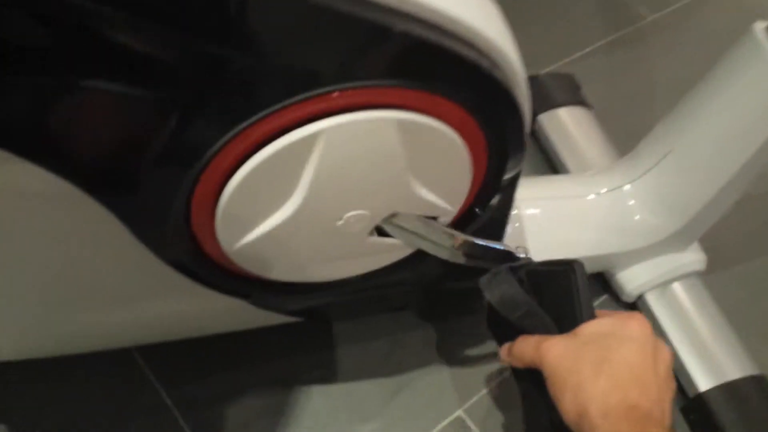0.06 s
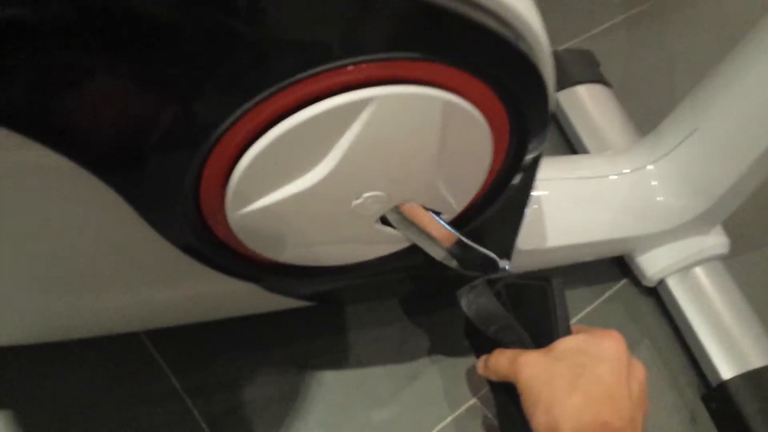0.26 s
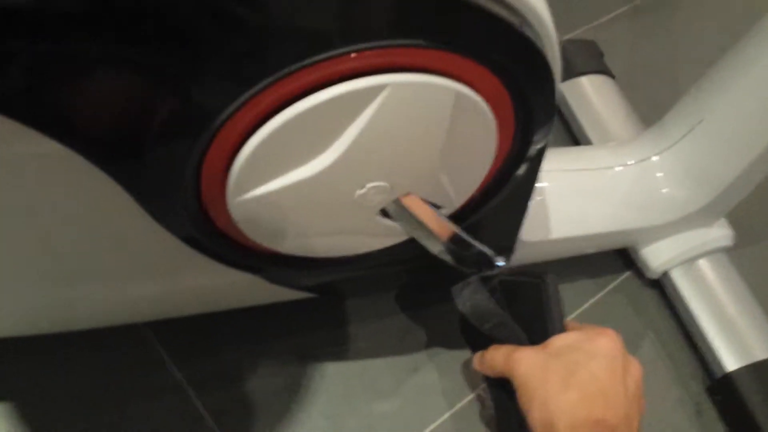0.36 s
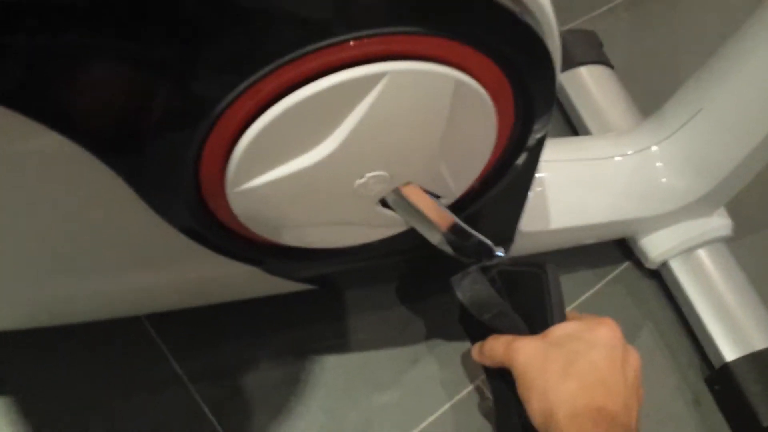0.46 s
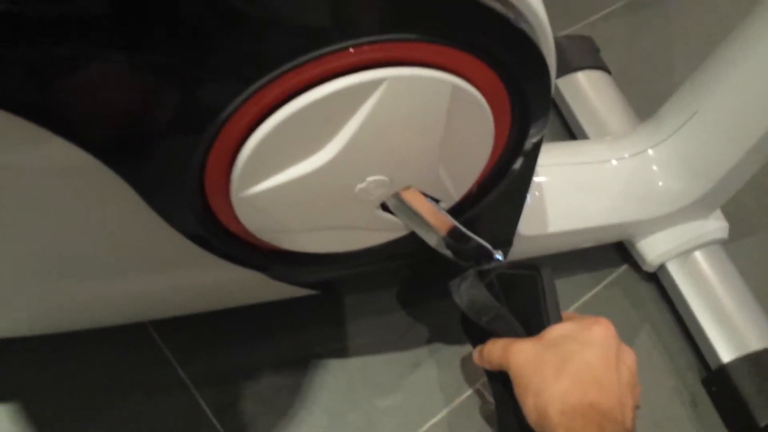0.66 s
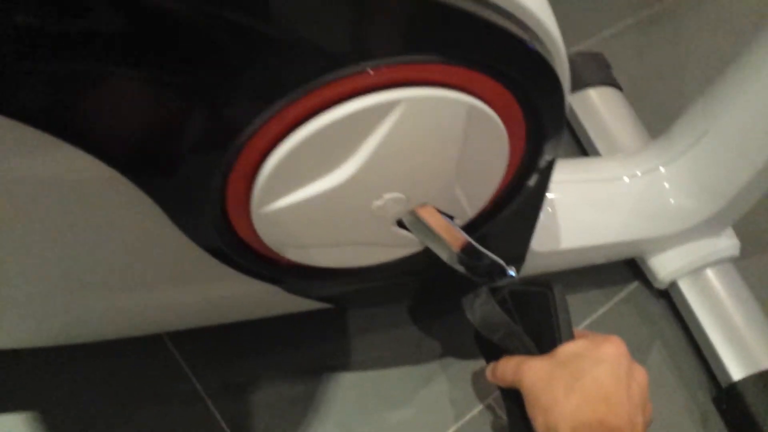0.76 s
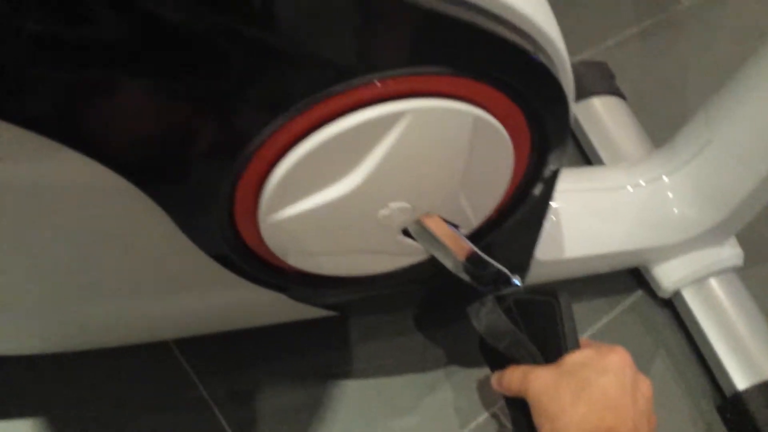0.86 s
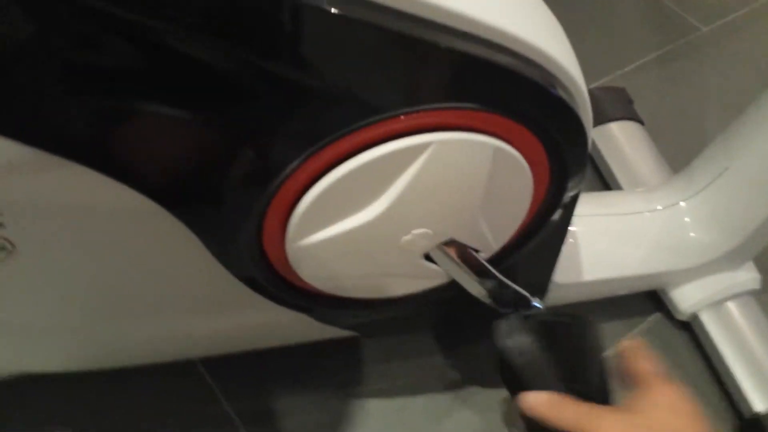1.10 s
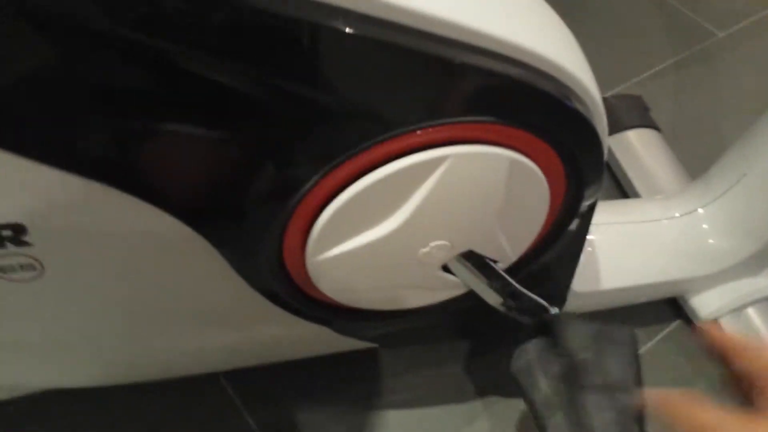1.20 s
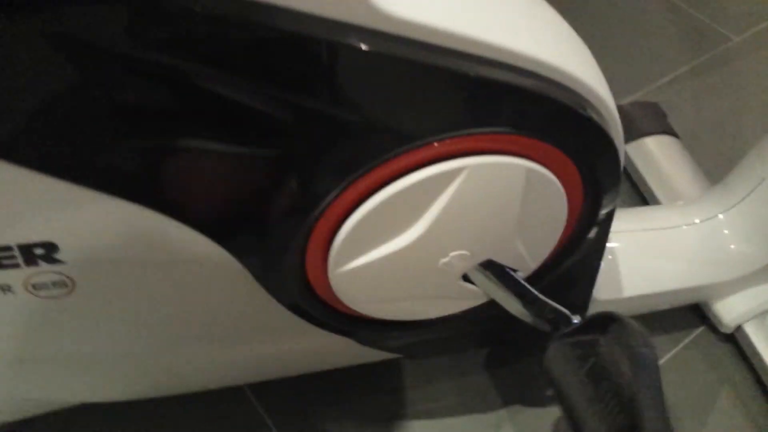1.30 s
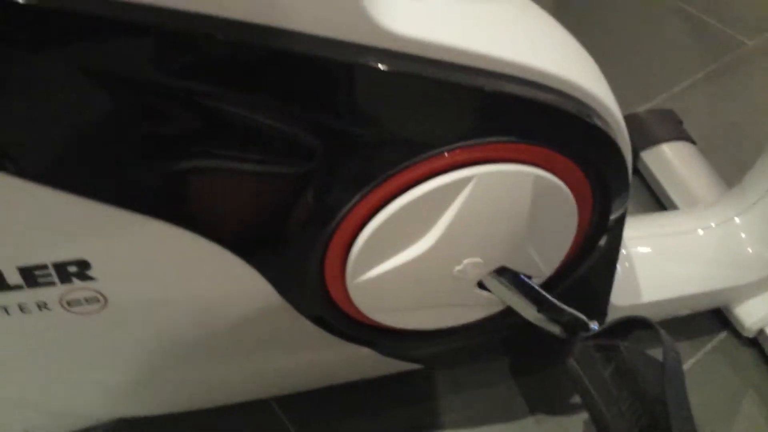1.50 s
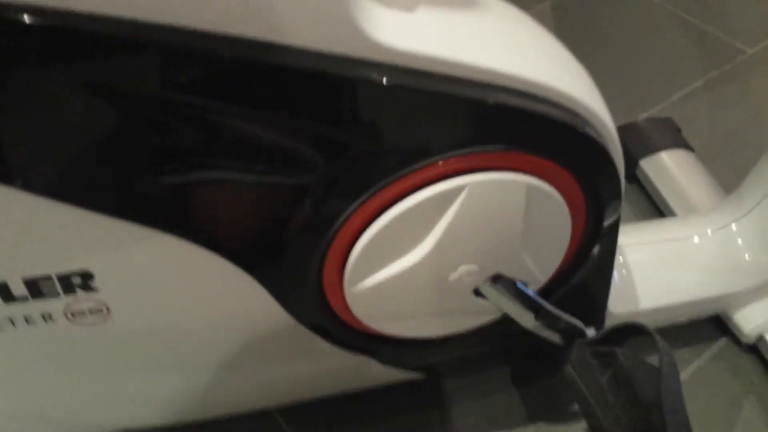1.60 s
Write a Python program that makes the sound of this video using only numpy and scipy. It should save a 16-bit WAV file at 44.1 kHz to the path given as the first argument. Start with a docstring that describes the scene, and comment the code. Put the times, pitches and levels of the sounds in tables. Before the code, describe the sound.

Close up in a quiet, slightly echoing room, an exercise bike's flywheel gives a short, squeaky scrape and jams, making the housing boom. A faint hand rustle leads into one sharp pedal clack, followed by soft knocks.

```python
"""The flywheel of an exercise bike, turned by hand close by, grinds hard and sings briefly as the hiss
of an earlier scrape dies away. Stick-slip friction excites the modes of the wheel until it jams, and
the blow sets the hollow housing booming. The hand lets go with a rustle; the pedal clacks in the play
of its bearing and knocks softly as it swings back. A quiet tiled room adds its reverberation."""
import sys
import numpy as np
from scipy import signal
from scipy.fft import rfft, irfft
from scipy.io import wavfile

SR = 44100
rng = np.random.default_rng(int(sys.argv[2]) if len(sys.argv) > 2 else 0)


def file_out(sig):
    """Save sig as 16-bit WAV at sys.argv[1]."""
    # one column per channel
    cols = np.atleast_2d(sig).T
    # limit, then scale
    lim = np.clip(cols, -1, 1)
    pcm = np.round(lim * 32767).astype(np.int16)
    wavfile.write(sys.argv[1], SR, pcm)


N = 72765
TIME = np.arange(N) / SR


# Friction force on the rim (time [s], level [dB])
RIM_FORCE = [(.19, -55), (.215, -35.5), (0.238, -22.5), (0.291, -19.5), (.345, -19.5), (.385, -17.5),
             (0.413, -21), (0.438, -42), (0.458, -31), (.54, -70.5)]
# Spectrum of the grinding (frequency [Hz], gain [dB])
RASP_SPECTRUM = [(60, -32.5), (120, -16), (200, -16), (320, -0.5), (450, -19), (560, -1), (800, -7),
                 (1400, 0), (2100, -1.5), (2400, -4.5), (3000, -6.5), (4000, -10.5), (4900, -9), (6600, -3),
                 (7700, -8.5), (8800, -14.5), (9700, -35.5), (10600, -21), (13000, -58)]
# Modes of the flywheel (frequency [Hz], relative level [dB], T60 [s])
WHEEL_MODES = [(331.7, -11, .15), (535.2, -8.5, 0.4), (826, -14, 0.083), (1031, -3, 0.081), (1208, -6, .25),
               (1407, -7.5, 0.11), (1483, -6.5, 0.53), (1653, -13.5, .12), (1917, -5, 0.17),
               (2013, 1, 0.067), (2157, -19.5, 0.52), (2720, 1, 0.067), (3154, 0.5, 0.064),
               (5770, 0, 0.035)]
def flywheel(slips_per_s=5000, spread_db=1.5, sway_db=3.5, sway_hz=42, rasp_db=-3, ring_db=-6):
    """Stick-slip friction: dense tiny slips of the rim rasp and drive the modes of the wheel."""
    slips = (rng.random(N) < slips_per_s / SR) * rng.choice([-1, 1], N)
    sizes = amp(spread_db * np.minimum(rng.exponential(1, N), 4))
    force = unit(slips * sizes * chatter()) * envelope(RIM_FORCE)
    ring = np.zeros(N)
    for hz, db, t60 in WHEEL_MODES:
        coupling = amp(sway_db * drift(sway_hz))  # the moving contact favours each mode in turn
        ring += amp(db) * unit(signal.fftconvolve(force * coupling, mode(hz, t60))[:N])
    ring = signal.sosfilt(signal.butter(2, [220, 7000], "band", fs=SR, output="sos"), ring)
    rasp = colour(force, RASP_SPECTRUM)
    return np.std(force) * (amp(rasp_db) * unit(rasp) + amp(ring_db) * unit(ring))


# Tones of the catching rim (time [s], duration [s], frequency [Hz], level [dB])
RIM_TONES = [(-.02, .065, 1873, -41), (-.02, .12, 4673, -51), (.108, .105, 4673, -45.5),
             (-.02, .22, 6700, -50), (.266, .04, 2050, -27), (.275, .035, 2706, -28), (.38, .045, 798, -28),
             (.402, .04, 1876, -21), (1.483, .05, 1875, -67)]
def squeals(waver=.0008, waver_hz=50, skew=.65):
    """Self-excited oscillation: friction locks on to one mode for a moment."""
    out = np.zeros(N)
    for start, length, hz, db in RIM_TONES:
        t = np.arange(0, length, 1 / SR)
        pitch = hz * (1 + waver * drift(waver_hz)[:len(t)])
        swell = np.sqrt(abs(np.sin(np.pi * (t / length) ** skew)))
        add(out, start, amp(db) * swell * np.sin(2 * np.pi * np.cumsum(pitch) / SR))
    return out


# Force of the loaded drive (time [s], level [dB])
DRIVE_FORCE = [(0, -59), (.08, -63), (.18, -60.5), (.205, -41), (.25, -53.5), (.32, -54.5), (.39, -40.5),
               (.435, -29), (.47, -45), (.56, -35.5)]
# Blows on the housing (time [s], level [dB], contact time [s], gain of the deep modes [dB])
BLOWS = [(0.4384, -14, 0.00053, -5.5), (0.452, -22, 0.0043, 11.5), (1.064, -37.5, 0.0016, -28),
         (1.086, -34.5, 0.0014, -6.5), (1.514, -44.5, 0.00066, -10), (1.536, -43, 0.0017, -13),
         (1.558, -51.5, .001, -0.5), (1.615, -52.5, .0007, -13.5)]
# Radiation of the housing, weak in the deep bass (frequency [Hz], gain [dB])
HOUSING_RADIATION = [(25, -22.5), (55, 1), (75, -5), (95, 2.5), (330, -4.5), (600, 6), (1200, -20.5),
                     (5000, -36.5)]
def housing():
    """Forced vibration: the drive and the blows shake the housing; longer contact sounds duller."""
    response = housing_response(deep_db=-5)
    force = rng.standard_normal(N) * envelope(DRIVE_FORCE)
    out = signal.fftconvolve(force, response / np.linalg.norm(response))[:N]
    for start, db, contact, deep_db in BLOWS:
        pulse = np.exp(-(2 * (TIME[:SR // 50] / contact - 1)) ** 2)
        add(out, start, amp(db) * signal.fftconvolve(housing_response(deep_db), pulse / pulse.sum()))
    return colour(out, HOUSING_RADIATION)


# Modes of the hollow housing (frequency [Hz], relative level [dB], T60 [s])
HOUSING_MODES = [(102.1, -5.5, 0.12), (125.3, -9, .2), (162, 0.5, 0.046), (197.7, 1.5, 0.099),
                 (233.5, 2, 0.073), (308, -6.5, 0.19), (362.2, -13, 0.28)]
def housing_response(deep_db, deep_below_hz=140):
    """Modal superposition: neighbouring modes start in antiphase, so the boom of a tap swells."""
    boom = sum((-1) ** k * amp(db + deep_db * (hz < deep_below_hz)) * mode(hz, t60)
               for k, (hz, db, t60) in enumerate(HOUSING_MODES))
    return boom / abs(boom).max()


# Contacts in the bearing (time [s], level [dB], decay time [s], centre frequency [Hz])
PEDAL_IMPACTS = [(1.0312, -51, .0025, 4200), (1.065, -19, .0012, 6200), (1.08, -30, .0022, 4500),
                 (1.1133, -38, .0015, 4600), (1.36, -60, .002, 7000), (1.478, -59, .004, 5800),
                 (1.612, -53, .004, 8000)]
# Spectrum of a contact (frequency [Hz], gain [dB])
IMPACT_SPECTRUM = [(200, -6.5), (700, -7.5), (1100, -8.5), (2500, -4.5), (7000, 5.5), (10000, -19.5),
                   (14500, -22)]
# Spectrum of the loose parts (frequency [Hz], gain [dB])
BUZZ_SPECTRUM = [(200, -34), (750, -23), (1080, 10), (1350, 0.5), (1750, 5.5), (3000, 0), (4500, 0.5),
                 (6500, 6.5), (9000, -14), (14500, -14.5)]
def pedal_clacks(rise_s=.0004, peak_db=7, width_octaves=.55, buzz_db=-22, buzz_decay_s=.035):
    """Backlash: the loose pedal makes hard, quickly damped impacts, and loose parts buzz after each."""
    out, t = np.zeros(N), TIME[:SR // 4]
    attack = np.minimum(t / rise_s, 1)
    for start, db, decay, centre_hz in PEDAL_IMPACTS:
        def peak(hz):
            return peak_db * np.exp(-.5 * (np.log2((hz + 1) / centre_hz) / width_octaves) ** 2)
        burst, buzz = rng.standard_normal((2, len(t)))
        burst = unit(colour(burst, IMPACT_SPECTRUM, peak)) * np.exp(-t / decay)
        buzz = unit(colour(buzz, BUZZ_SPECTRUM)) * np.exp(-t / buzz_decay_s)
        add(out, start, amp(db) * attack * (burst + amp(buzz_db) * buzz))
    return out


# The hand sliding off the pedal (time [s], level [dB])
HAND_SLIDE = [(.78, -78.5), (.92, -63), (1.01, -59), (1.06, -55), (1.12, -78)]
# Spectrum of skin on the strap (frequency [Hz], gain [dB])
RUSTLE_SPECTRUM = [(80, -6.5), (220, 0), (500, -1.5), (900, -10), (2000, -5), (4000, -7), (7000, -3),
                   (10000, -17), (14500, -16.5)]
def hand_rustle():
    """Sliding friction: skin and strap rustle faintly as the hand lets go."""
    return friction_noise(RUSTLE_SPECTRUM) * envelope(HAND_SLIDE, before_db=-120)


# Spectrum of a scrape's reverberation (frequency [Hz], gain [dB])
SCRAPE_TAIL_SPECTRUM = [(59, -37), (100, -17.5), (313, -6), (406, -14), (549, -9.5), (631, -26.5),
                        (1040, -6), (1720, -12), (2020, -1.5), (2420, -10), (4230, -9), (4590, -11),
                        (5390, -14.5), (6070, -4), (12000, -34), (15600, -77), (22000, -120)]
def scrape_tail(start_db=-34, fade_db_per_s=69.5):
    """Reverberation: the hiss of an earlier scrape dies away in the room."""
    return amp(start_db - fade_db_per_s * TIME) * friction_noise(SCRAPE_TAIL_SPECTRUM)


# Reverberation time of the tiled room (frequency [Hz], T60 [s])
ROOM_DECAY = [(80, 0.19), (250, 0.74), (600, 0.81), (2000, 0.81), (5000, .78), (8000, 0.62), (13000, 0.49)]
# Left ear relative to the right (frequency [Hz], gain [dB])
LEFT_SHADOW = [(60, -2), (180, -7.5), (350, -3), (700, -6), (1400, -6.5), (2800, -12.5), (5500, -8.5),
               (10000, -10.5)]
def room(x, wet_db, build_s=.0014, scatter_s=.0028, left_lag_s=.000278):
    """Reverberation: a diffuse tail follows the direct sound; the left ear lies in acoustic shadow."""
    hz, t, spectra = signal.stft(rng.standard_normal((2, SR)), SR, nperseg=256)
    decay = amp(-60 * t / read(ROOM_DECAY, hz)[:, None])
    spectra = spectra * decay * (1 - np.exp(-t / build_s))
    tails = two_ears(*signal.istft(spectra, SR, nperseg=256)[1][:, :SR])
    tails /= np.linalg.norm(tails[0])
    # The direct sound reaches the left ear later, its treble scattered in phase.
    scatter = rfft(rng.standard_normal(N) * np.exp(-TIME / scatter_s), 2 * N)
    hz = np.fft.rfftfreq(2 * N, 1 / SR)
    phase = np.angle(scatter) * (1 - read(EAR_COHERENCE, hz)) - 2 * np.pi * hz * left_lag_s
    direct = np.array([x, irfft(rfft(x, 2 * N) * np.exp(1j * phase))[:N]])
    right, left = direct + amp(wet_db) * signal.fftconvolve(x[None], tails, axes=1)[:, :N]
    return np.array([colour(left, LEFT_SHADOW), right])


# Likeness of the two ears (frequency [Hz], coherence [0..1])
EAR_COHERENCE = [(40, 0.98), (130, 1), (300, 1), (700, 1), (1400, 0.18), (3000, 0.13), (8000, 0.065)]
def two_ears(a, b):
    """Interaural coherence: two independent noises blend, alike in the bass and apart in the treble."""
    coherence = read(EAR_COHERENCE, np.fft.rfftfreq(len(a), 1 / SR))
    blend = coherence * rfft(a) + np.sqrt(1 - coherence ** 2) * rfft(b)
    return np.array([a, irfft(blend, len(a))])


# Spectrum of the quiet room (frequency [Hz], gain [dB])
AMBIENT_SPECTRUM = [(25, -11), (60, -7.5), (110, -7), (250, -17), (500, -14), (1000, -15.5), (2000, -15),
                    (4000, -17.5), (6500, -15), (9000, -16), (14500, -33)]
def room_hiss(left_db=-69.5, right_db=-66):
    """Ambient noise: a faint, steady, diffuse field."""
    ears = two_ears(*[colour(x, AMBIENT_SPECTRUM) for x in rng.standard_normal((2, N))])
    return amp([[left_db], [right_db]]) * unit(ears)


def friction_noise(spectrum):
    """Amplitude modulation: chattering noise, filtered to a spectrum, at rms 1."""
    return unit(colour(rng.standard_normal(N) * chatter(), spectrum))


def chatter(depth_db=.96, rate_hz=90):
    """Random modulation: a gain that flickers slightly."""
    return amp(depth_db * drift(rate_hz))


def drift(rate_hz):
    """Low-pass noise: a smooth random fluctuation of rms 1."""
    hz = np.fft.rfftfreq(N, 1 / SR)
    return unit(irfft(rfft(rng.standard_normal(N)) / (1 + (hz / rate_hz) ** 4), N))


def mode(hz, t60):
    """Damped harmonic oscillator: one second of free decay."""
    t = TIME[:SR]
    return amp(-60 * t / t60) * np.cos(2 * np.pi * hz * t)


def colour(x, spectrum, boost_db=lambda hz: 0, size=4096):
    """Minimum-phase filter: its gain follows a spectrum table plus an optional boost."""
    hz = abs(np.fft.fftfreq(size, 1 / SR))
    log_gain = np.log(amp(read(spectrum, hz) + boost_db(hz)))
    taps = np.fft.ifft(np.exp(np.conj(signal.hilbert(log_gain)))).real[:size // 2]
    return signal.fftconvolve(x, taps)[:len(x)]


def envelope(points, before_db=None):
    """Amplitude envelope: levels interpolated in time, silent after the last."""
    return amp(np.interp(TIME, *np.transpose(points), left=before_db, right=-120))


def read(points, hz):
    """Interpolation on a log-frequency axis."""
    f, value = np.transpose(points)
    return np.interp(np.log(hz + 1), np.log(f + 1), value)


def add(mix, start_s, sound):
    """Superposition: a sound joins the mix at a given time."""
    at = round(start_s * SR)
    sound = sound[max(-at, 0):]
    part = mix[max(at, 0):][:len(sound)]
    part += sound[:len(part)]


def amp(db):
    """Decibels to amplitude ratio."""
    return 10 ** (np.asarray(db) / 20)


def unit(x):
    """Normalisation to rms 1."""
    return x / np.sqrt(np.mean(x ** 2) + 1e-20)


def scene():
    """Superposition: wheel, housing and pedal sound in one room, over its hiss."""
    wheel = room(flywheel(), wet_db=-3.5) + room(squeals(), wet_db=-7)
    tail = room(scrape_tail(), wet_db=-11.5)
    thuds = room(housing(), wet_db=-6)
    pedal = room(pedal_clacks() + hand_rustle(), wet_db=-11.5)
    return wheel + tail + thuds + pedal + room_hiss()


def record(dry):
    """Band limiting: a steep low-pass at 14.8 kHz."""
    taps = signal.firwin(511, 14800, window=("kaiser", 9), fs=SR)
    return signal.oaconvolve(dry, taps[None], "same")


dry = scene()
out = record(dry)
file_out(out)
```